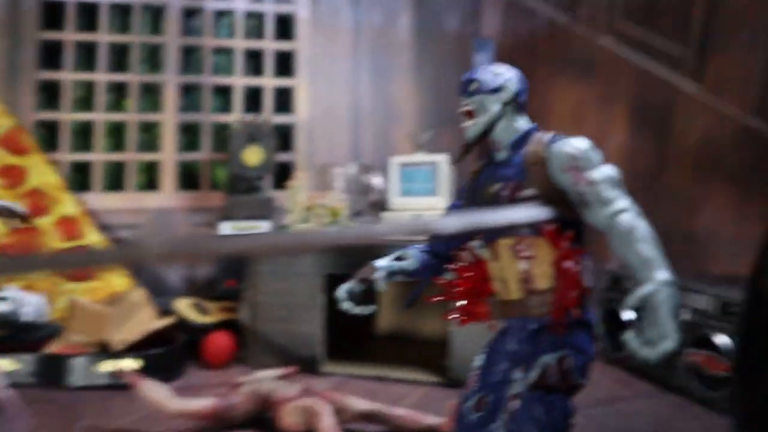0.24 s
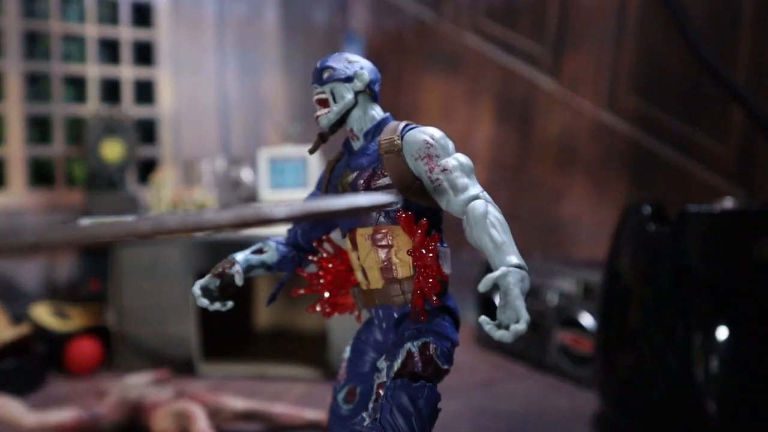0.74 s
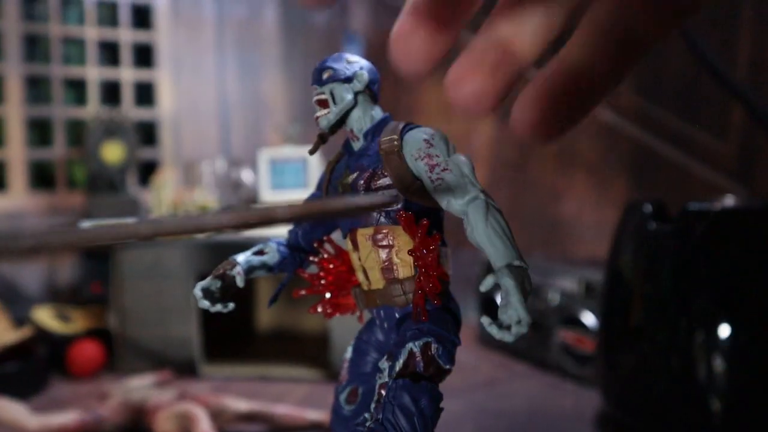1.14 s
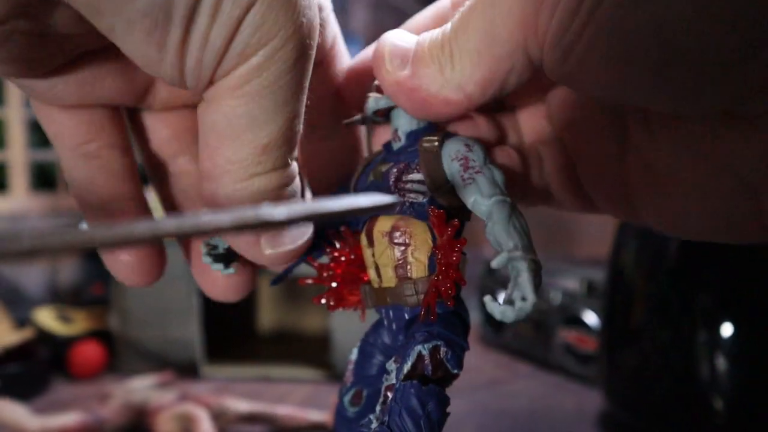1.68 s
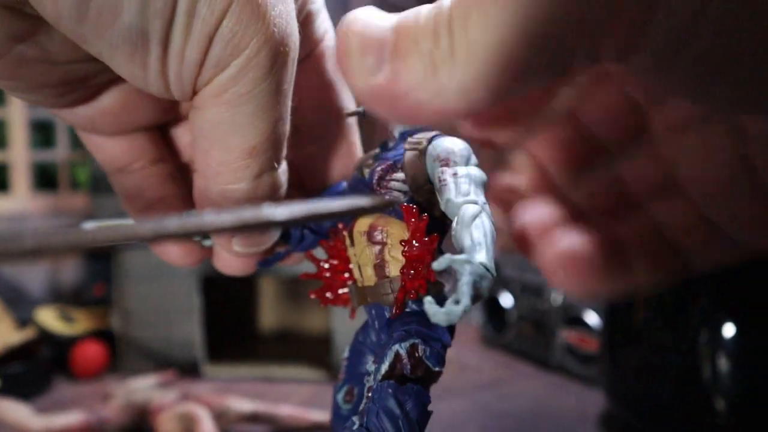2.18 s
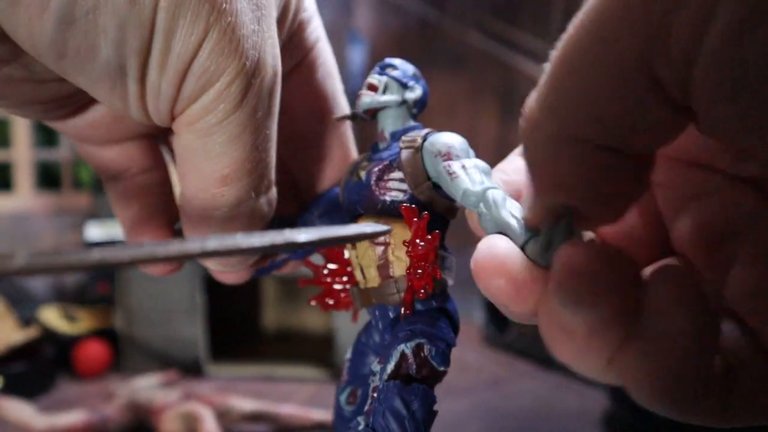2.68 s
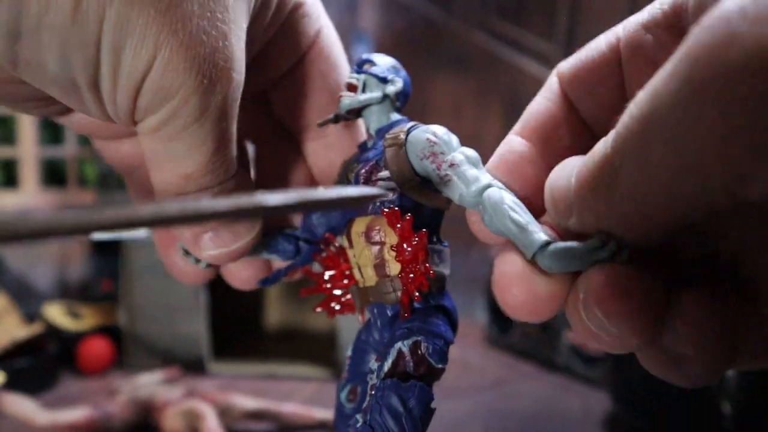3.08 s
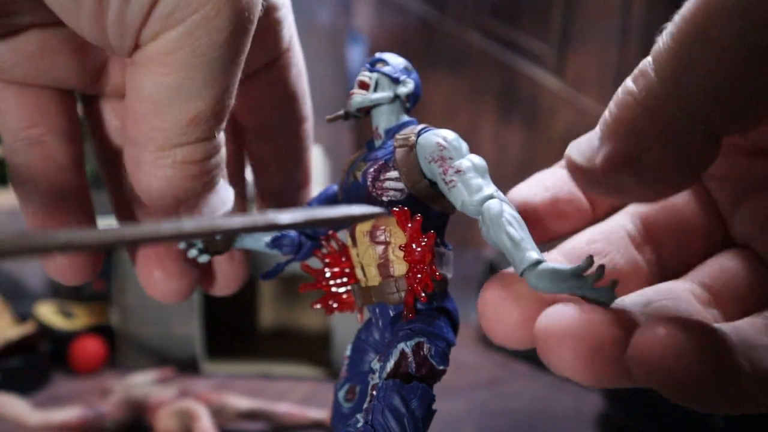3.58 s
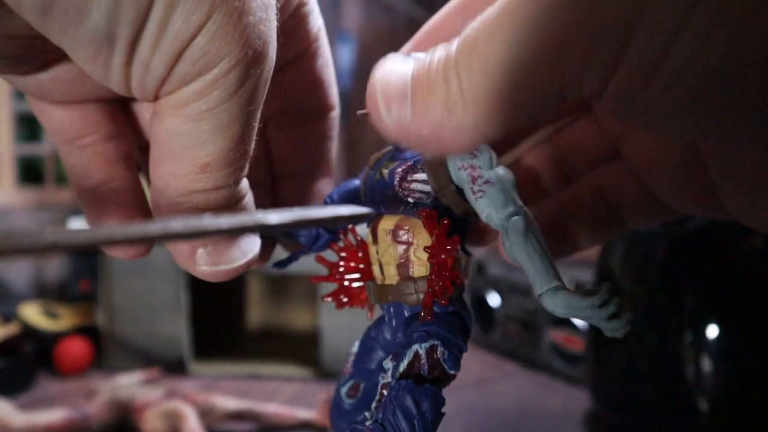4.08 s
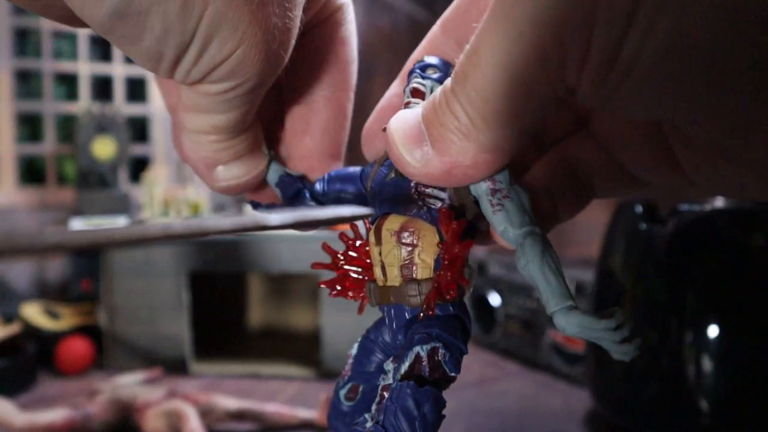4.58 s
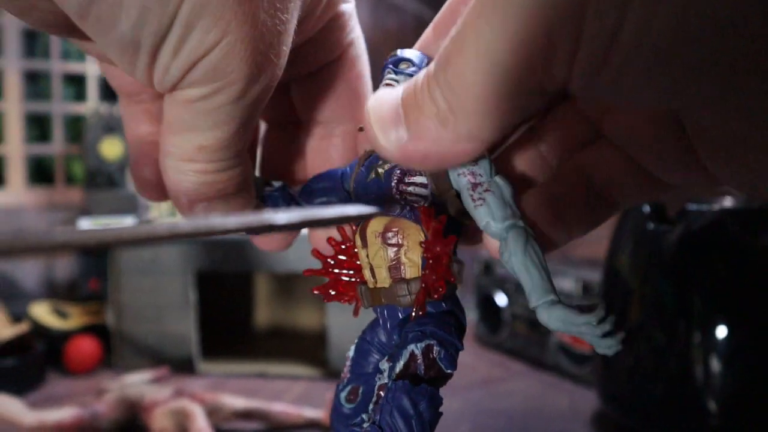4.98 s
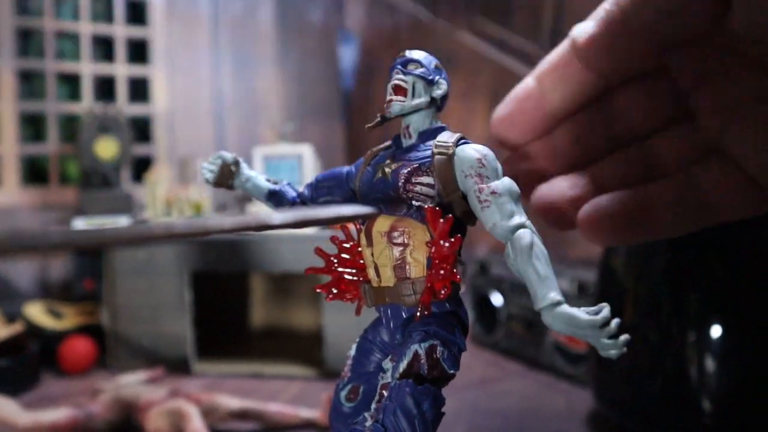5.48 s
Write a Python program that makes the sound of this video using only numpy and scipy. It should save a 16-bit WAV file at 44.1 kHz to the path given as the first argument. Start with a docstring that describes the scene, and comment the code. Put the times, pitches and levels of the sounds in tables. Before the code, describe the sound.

Close stereo in a small room: right away a stand swings and judders with deep thuds, dull clacks and fine crackle, dying out after half a second. Over faint air and a throbbing motor hum, hands then pose a plastic figure with crisp clicks, hollow limb knocks, light scrapes and one short squeak near two and a half seconds.

```python
"""A small room with a humming motor, where hands pose a plastic action figure on a table close to a stereo microphone.
The air is coloured noise; the motor is a set of loosely locked overtones, throbbing about thirty times a second.
The microphone's stand is swung round and judders to rest: impulses ring its modes and set off noise bursts.
Then joints and small parts click, knock, scrape and squeak: noise bursts, short tones and a ringing body."""
import sys
import numpy as np
from scipy import signal
from scipy.fft import rfft, irfft, next_fast_len
from scipy.io import wavfile

SR = 44100
rng = np.random.default_rng(int(sys.argv[2]) if len(sys.argv) > 2 else 0)


def unload_wav(signal):
    """Save mono or channel-first audio to the path in sys.argv[1] as 16-bit WAV at rate SR, clipped to [-1, 1]."""
    wavfile.write(
        sys.argv[1],
        SR,
        np.round(np.clip(np.atleast_2d(signal).T, -1, 1) * 32767).astype(np.int16),
    )


N = 253073
TIME = np.arange(N) / SR

# Levels in tables are source settings, ahead of offsets, filters and panning; noise colours are relative shapes.
# room rumble colour: pitch_hz, density_db_per_hz
RUMBLE_COLOUR = [(15, -43), (28, -2.5), (45, -0.5), (75, 4.5), (120, 4), (180, 10.5), (260, -2.5),
                 (400, -36.5)]
# murky middle colour: pitch_hz, density_db_per_hz
MIDDLE_COLOUR = [(130, -0.5), (250, 4.5), (550, 1.5), (900, -2.5), (1400, -5.5), (2800, -11.5),
                 (5000, -17.5), (9000, -36)]
# hiss colour: pitch_hz, density_db_per_hz
HISS_COLOUR = [(1200, 9), (3000, 5), (5000, 2), (8000, -3), (11000, 0), (12500, -16), (16000, -55)]
# stereo width of the room: pitch_hz, side_minus_mid_db
ROOM_WIDTH = [(60, -14), (110, -18.5), (200, -7.5), (380, 1), (700, -0.5), (1290, 5.5), (2380, 4.5),
              (4400, 6.5), (8120, 5), (15000, 14.5)]
# stereo width right at the microphone: pitch_hz, side_minus_mid_db
NEAR_WIDTH = [(120, -24), (250, -25), (500, -0.5), (1000, -5), (2000, 1), (4000, 4.5), (10000, 7.5),
              (15000, 0.5)]
# motor running speed, sag excluded: time_s, turns_per_s
MOTOR_SPEED = [(1.8, 31), (2.4, 30.8), (3.0, 29.5), (4.0, 30.3), (5.0, 30.15), (5.74, 30.1)]
# overtones of the deep drone: multiple_of_turning_rate, level_db
DEEP_OVERTONES = [(4, -13.5), (5, -5), (6, -6.5), (7, 1), (8, -19), (9, -9.5), (10, -24), (16, -24),
                  (20, -19.5)]
# overtones of the upper drone: multiple_of_turning_rate, level_db
UPPER_OVERTONES = [(11, -8), (12, 1.5), (13, -7)]
# deep drone level: time_s, level_db
DEEP_LEVEL = [(0, -49), (1.1, -50.5), (2.4, -48.5), (3.0, -42), (3.7, -44), (4.549, -39), (5.0, -42),
              (5.74, -45.5)]
# upper drone level: time_s, level_db
UPPER_LEVEL = [(0.7, -51.5), (0.95, -57), (1.75, -49), (2.05, -62.5), (2.8, -54.5), (3.8, -55),
               (4.46, -44.5), (5.23, -47), (5.74, -42)]
# jolts of the stand: start_s, thud_db, clack_db, clack_pitch_hz, rattle_db
STAND_JOLTS = [(0.166, -8.5, -18.5, 310, -30), (0.1728, -21, -13.5, 984, -19.5), (0.18, -14, -20, 500, -38),
               (0.1866, -13, -17.5, 760, -34), (0.192, -23, -25.5, 330, -33),
               (0.205, -35, -21.5, 1100, -32.5), (0.2135, -20, -19, 470, -33), (0.227, -27, -25, 400, -39),
               (0.252, -25, -33, 400, -51), (0.3265, -28, -23, 875, -31), (0.331, -13.5, -30, 240, -45),
               (0.344, -18, -23.5, 800, -33), (0.3768, -17, -22.5, 800, -41), (0.3923, -17, -26, 716, -43),
               (0.4013, -31, -24.5, 1155, -47), (0.413, -22, -28.5, 380, -50), (0.44, -29, -35, 450, -32),
               (0.495, -19, -31, 400, -45.5), (0.511, -16, -33, 905, -53), (0.544, -17, -37, 300, -51),
               (0.572, -28.5, -32.5, 1260, -56), (0.586, -44, -48, 750, -60), (4.7, -29, -44, 860, -46)]
# modes of the stand: pitch_hz, level_db, t60_s
STAND_MODES = [(46.4, -20, 0.096), (78.4, -6, 0.097), (105.6, -7.5, 0.24), (148, -4, 0.083),
               (182.9, -8, 0.058), (274, -19, 0.053)]
# colour of the stand's clack: pitch_hz, density_db_per_hz
CLACK_COLOUR = [(25, -1), (90, -4), (250, 9.5), (450, 6.5), (700, 1), (1050, -1), (1500, -12), (3000, -23),
                (8000, -45)]
# colour of its loose parts: pitch_hz, density_db_per_hz
RATTLE_COLOUR = [(300, -53), (1500, 5.5), (3000, -2.5), (4600, 7), (6000, 5.5), (8500, 11), (11000, 9),
                 (12500, -6), (16000, -27)]
# colour of its crackle: pitch_hz, density_db_per_hz
CRACKLE_COLOUR = [(200, 6), (1000, -1), (2200, -1), (4000, -2.5), (7000, -0.5), (14000, -45)]
# modes of the figure's body: pitch_hz, level_db, t60_s
BODY_MODES = [(127, -3.5, 0.053), (283, 0, 0.027), (452, -1, 0.038), (658, 2, 0.025), (771, 2, 0.027),
              (1013, -5.5, 0.055), (1200, -2, 0.015), (1510, 2.5, 0.0058), (1894, -4, 0.021),
              (2850, -4.5, 0.022)]
# colour of a plastic snap: pitch_hz, density_db_per_hz
SNAP_COLOUR = [(400, -13), (1500, -7), (2300, 2), (3100, 4), (4200, 2.5), (5800, 1.5), (7500, 0.5),
               (10500, 2), (12500, -7.5), (16000, -31)]
# soft band-noise swells: the stand's scuff and falling chirp, rubs on the toy, low body of the joint's squeak:
# start_s, length_s, start_pitch_hz, end_pitch_hz, width_hz, level_db
NOISE_SWELLS = [(0.027, 0.057, 1890, 2300, 1000, -38), (0.207, 0.012, 4900, 2200, 300, -36),
                (0.443, 0.031, 2000, 3400, 1500, -42.5), (1.1, 0.091, 9400, 9800, 3992, -51.5),
                (1.109, 0.28, 2210, 2000, 600, -54.5), (2.185, 0.038, 10100, 10100, 4000, -55),
                (2.437, 0.058, 216, 203, 90, -38.5), (3.071, 0.075, 1053, 2900, 900, -51),
                (4.396, 0.044, 1303, 800, 600, -53), (4.84, 0.045, 9020, 8700, 3020, -56)]
# finger grips: start_s, length_until_release_s, effort_0_to_1
GRIPS = [(1.387, 0.59, 0.44), (1.963, 1.34, 0.28), (3.746, 0.28, 0.15), (4.164, 0.39, 0.6),
         (4.69, 0.37, 0.52)]
# sliding parts and fingertips: start_s, length_s, grit_db, body_db
SCRAPES = [(0.039, 0.022, -52, -41), (1.273, 0.014, -44, -54), (1.283, 0.025, -51.5, -43),
           (1.439, 0.02, -46, -45.5), (2.644, 0.025, -45.5, -53), (2.778, 0.036, -43.5, -48.5),
           (3.082, 0.053, -48, -57.5), (4.25, 0.052, -62, -51.5), (4.458, 0.053, -53, -57),
           (4.6964, 0.0096, -25, -31), (4.702, 0.048, -51, -48), (4.773, 0.029, -48.5, -57)]
# limbs against the torso: start_s, level_db, pitch_hz
LIMB_KNOCKS = [(1.6025, -30.5, 1180), (1.6315, -23.5, 762), (1.927, -33, 1010), (2.802, -29, 670),
               (4.702, -35, 936)]
# slips of a tight joint: start_s, level_db
SQUEAK_SLIPS = [(2.4596, -23.5), (2.48, -41)]
# sharp plastic clicks: start_s, level_db, pitch_hz, body_db_relative_to_level
CLICKS = [(0.325, -18.5, 10200, -17), (0.573, -32, 4500, -11), (1.4422, -29.5, 4640, -23),
          (1.458, -32, 9000, -25), (1.5146, -35, 4800, -14), (1.522, -32, 4700, -20),
          (1.531, -15.5, 8000, -26), (1.5345, -28.5, 3120, -14), (1.6015, -20, 4220, -11),
          (1.6303, -23, 9800, -10), (1.6874, -37, 2920, -16), (1.7046, -32.5, 2510, -16),
          (1.8083, -29.5, 5470, -21), (1.8394, -38, 8900, -18), (1.861, -33.5, 2840, -25),
          (1.926, -21.5, 7200, -14), (2.0509, -38, 8300, -7.5), (2.1882, -25, 10500, -11.5),
          (2.4332, -27.5, 2850, -15), (2.4978, -34, 2900, -12), (2.5285, -31.5, 8000, -18),
          (2.645, -21.5, 9300, -31), (2.667, -35, 10100, -21), (2.691, -24, 9800, -35),
          (2.803, -38, 3100, -7), (2.8734, -34, 9200, -14), (2.9037, -25.5, 6760, -13.5),
          (3.011, -35.5, 3870, -24), (3.057, -44.5, 2880, -15), (3.13, -36, 3200, -12),
          (3.249, -33.5, 9600, -20), (3.7874, -37.5, 9750, -14), (3.8114, -45, 3110, -24),
          (3.9572, -39, 8960, -5), (4.056, -37.5, 2802, -20), (4.201, -32, 10620, -10.5),
          (4.2561, -33, 9800, -10), (4.2664, -37, 7000, -6), (4.2804, -26, 2620, -13.5),
          (4.323, -20, 10700, -21), (4.3419, -37, 2770, -12), (4.3862, -32.5, 7330, -14),
          (4.4092, -32, 10580, -23), (4.4803, -34.5, 2350, -12), (4.4904, -36.5, 5710, -21),
          (4.5034, -39, 6480, -9), (4.56, -41, 6600, 0.5), (4.6767, -33, 10600, -23),
          (4.6978, -16, 9600, -13), (4.7006, -19, 4200, -18.5), (4.7027, -19, 10000, -15),
          (4.776, -28, 8800, -8.5), (4.7795, -37, 8900, -20), (4.845, -39, 4460, -1),
          (4.9008, -38, 8500, -12), (4.9142, -33, 3100, -13), (4.9731, -42.5, 2430, -12),
          (5.0072, -33.5, 3050, -11), (5.012, -35, 4260, -12), (5.02, -34.5, 4840, -11)]

RUMBLE_DB, MIDDLE_DB, HISS_DB = -48.5, -47.5, -58
SWING_START_S, SWING_RISE_S, SWING_END_S = 0.013, 0.023, 0.54
SWING_RUMBLE_DB, SWING_RUMBLE_T60_S = -37.5, 0.63
SWING_HISS_DB, SWING_HISS_FADE_DB_PER_S = -43, 10
# one motor sag under load; its overtones tilt about the fifth
SAG_START_S, SAG_LENGTH_S, SAG_TURNS_PER_S = 1.84, 0.6, 8.8
SAG_FIFTH_GAIN_DB, SAG_TILT_DB_PER_OCTAVE = 0.5, 4.5
SHUDDER_DB, SHUDDER_HZ = -47.5, 88
DRAG_START_S, DRAG_LENGTH_S, DRAG_DB = 0.33, 0.1, -33
# crackle fades slowly, then by its t60 as well once the stand rests
CRACKLE_DB, CRACKLE_FADE_DB_PER_S = -38, 19
CRACKLE_REST_S, CRACKLE_T60_S = 0.573, 0.13
GRIP_RAMP_S = 0.12
# at full effort
TICKS_PER_S, RUSTLE_DB = 140, -55
SQUEAK_START_HZ, SQUEAK_RISE_HZ_PER_S = 1063, 1400
SQUEAK_ATTACK_S, SQUEAK_HOLD_S, SQUEAK_T60_S = 0.002, 0.0063, 0.031
CUTOFF_HZ = 16300


def from_db(db):
    """Decibels to gain."""
    return 10 ** (np.asarray(db) / 20)


def rms_one(x):
    """Scale to unit rms."""
    return x / np.sqrt(np.mean(x ** 2) + 1e-20)


def since(start_s):
    """Seconds passed since a moment; zero before it."""
    return np.maximum(TIME - start_s, 0)


def in_time(points):
    """Interpolate (s, value) points at every sample."""
    s, value = np.transpose(points)
    return np.interp(TIME, s, value)


def add(out, start_s, sound):
    """Mix a short sound in at its moment."""
    i = round(start_s * SR)
    out[..., i:i + sound.shape[-1]] += sound


def noise():
    """Two unrelated white noises."""
    return rng.standard_normal((2, N))


def grit(spread_db):
    """Noise made of tiny slips, 32 samples each, of uneven size."""
    sizes = from_db(spread_db * rng.standard_normal(N // 32 + 1))
    return rms_one(noise() * np.repeat(sizes, 32)[:N])


def drift(points_per_s):
    """Slow random curve about zero; its points have unit spread."""
    points = rng.standard_normal(1024)
    return np.interp(TIME * points_per_s, np.arange(len(points)), points)


def blows(times_s, level_db):
    """One impulse for each event."""
    out = np.zeros(N)
    np.add.at(out, np.round(np.asarray(times_s) * SR).astype(int), from_db(level_db))
    return out


def fade(impulses, t60_s):
    """Envelope of energy put in by impulses and dying away."""
    energy_decay = from_db(-120 / (t60_s * SR))
    energy = signal.lfilter([1], [1, -energy_decay], impulses ** 2 + 1e-18)
    return np.sqrt(energy)


def colour(x, spectrum, keep_power=True):
    """Causal (minimum-phase) filter that follows (Hz, dB) points."""
    size = 2 * next_fast_len(N // 2 + 4096)
    point_hz, point_db = np.transpose(spectrum)
    bin_hz = np.arange(size // 2 + 1) * SR / size
    gain = from_db(np.interp(np.log(bin_hz + 1), np.log(point_hz), point_db))
    if keep_power:
        gain = rms_one(gain)
    # folding the cepstrum makes the phase minimal
    cepstrum = irfft(np.log(gain))
    cepstrum[1:size // 2] *= 2
    cepstrum[size // 2 + 1:] = 0
    response = np.exp(rfft(cepstrum))
    return irfft(rfft(x, size) * response)[..., :N]


def stereo(pair, width):
    """Filter mid and side to the given width, then form left and right."""
    mid_gain = [(hz, -10 * np.log10(1 + from_db(db) ** 2)) for hz, db in width]
    side_gain = [(hz, -10 * np.log10(1 + from_db(-db) ** 2)) for hz, db in width]
    mid = colour(pair[0], mid_gain, keep_power=False)
    side = colour(pair[1], side_gain, keep_power=False)
    return np.array([mid + side, mid - side])


def ring(x, modes):
    """Resonators in parallel, alternating in sign; a unit impulse rings each at its own level."""
    out = 0
    for k, (hz, db, t60_s) in enumerate(modes):
        radius = from_db(-60 / (t60_s * SR))
        w = 2 * np.pi * hz / SR
        feedback = [1, -2 * radius * np.cos(w), radius * radius]
        mode = signal.lfilter([0, from_db(db) * np.sin(w)], feedback, x + 1e-18)
        out = out + (-1) ** k * mode
    return out


def knocks(rows, t60_s, rise_s):
    """Blunt contacts: each a decaying sine at the pitch of the spot that is hit."""
    age, out = TIME[:4096], np.zeros(N)
    for s, db, hz in rows:
        envelope = from_db(db - 60 * age / t60_s) * (1 - np.exp(-age / rise_s))
        add(out, s, envelope * np.sin(2 * np.pi * hz * age))
    return out


def effort():
    """How hard the fingers work: each grip tightens, holds and lets go."""
    total = np.zeros(N)
    for s, length_s, hard in GRIPS:
        tighten = np.minimum(since(s) / GRIP_RAMP_S, 1)
        release = np.minimum(since(s + length_s) / GRIP_RAMP_S, 1)
        total += hard * (tighten - release)
    return total


def air():
    """Steady noise rush of rumble, middle and hiss; swinging stand and rustling fingers add to it."""
    after_swing = since(SWING_END_S)
    swing_rumble = from_db(SWING_RUMBLE_DB - 60 * after_swing / SWING_RUMBLE_T60_S)
    rumble_gain = np.hypot(from_db(RUMBLE_DB), swing_rumble)
    swing_hiss = from_db(SWING_HISS_DB - SWING_HISS_FADE_DB_PER_S * after_swing)
    swing_hiss = swing_hiss * np.minimum(since(SWING_START_S) / SWING_RISE_S, 1)
    rustle_power = from_db(RUSTLE_DB) ** 2 * effort()
    hiss_gain = np.sqrt(from_db(HISS_DB) ** 2 + swing_hiss ** 2 + rustle_power)
    rumble = colour(noise() * rumble_gain, RUMBLE_COLOUR)
    middle = colour(noise() * from_db(MIDDLE_DB), MIDDLE_COLOUR)
    hiss = colour(noise() * hiss_gain, HISS_COLOUR)
    return stereo(rumble + middle + hiss, ROOM_WIDTH)


def motor(scatter_rad=0.91, flutter_db=2.0, deep_waver_rad=0.34, upper_waver_rad=0.9, shudder_q=2.6):
    """Overtones of the turning rate, loosely in step, throb; under load it slows, dulls and shudders."""
    load = np.sin(np.pi * np.minimum(since(SAG_START_S) / SAG_LENGTH_S, 1))
    turns = np.cumsum(in_time(MOTOR_SPEED) - SAG_TURNS_PER_S * load) / SR
    peak = signal.iirpeak(SHUDDER_HZ, shudder_q, fs=SR)
    shudder = signal.lfilter(*peak, signal.lfilter(*peak, noise()[0]))
    out = from_db(SHUDDER_DB) * load * rms_one(shudder)
    deep = (DEEP_OVERTONES, DEEP_LEVEL, deep_waver_rad)
    upper = (UPPER_OVERTONES, UPPER_LEVEL, upper_waver_rad)
    for overtones, level, waver_rad in (deep, upper):
        drone_db = in_time(level)
        for multiple, db in overtones:
            phase = scatter_rad * rng.standard_normal() + waver_rad * drift(14.0)
            angle = 2 * np.pi * multiple * turns + phase
            sag_db = load * (SAG_FIFTH_GAIN_DB - SAG_TILT_DB_PER_OCTAVE * np.log2(multiple / 5))
            gain = from_db(drone_db + db + sag_db + flutter_db * drift(9.8))
            out = out + np.sqrt(2) * gain * np.sin(angle)
    return out * from_db([[-.2], [-.8]])


def stand(clack_t60_s=0.064, rattle_t60_s=0.22, left_db=1.5, ring_db=0.5, clack_noise_db=-2.0):
    """Jolts thud in the modes, clack in the head and leave loose parts sizzling; the head also drags."""
    s, thud_db, clack_db, clack_hz, rattle_db = np.transpose(STAND_JOLTS)
    thud = ring(blows(s, thud_db), STAND_MODES)
    rung = knocks(zip(s, clack_db + ring_db, clack_hz), t60_s=0.021, rise_s=0.0012)
    drag = from_db(DRAG_DB) * np.sin(np.pi * np.minimum(since(DRAG_START_S) / DRAG_LENGTH_S, 1))
    clack_gain = fade(blows(s, clack_db + clack_noise_db), clack_t60_s)
    clack = colour(grit(2.4) * np.hypot(clack_gain, drag), CLACK_COLOUR)
    rattle_gain = fade(blows(s, rattle_db), rattle_t60_s)
    rattle = colour(grit(2.3) * rattle_gain, RATTLE_COLOUR)
    head = (rung + stereo(clack, NEAR_WIDTH)) * from_db([[left_db], [-left_db]])
    return thud + head + stereo(rattle, NEAR_WIDTH)


def crackle(grain_db=3.5, judder_db=-22.0):
    """The stand's head catches in fine, uneven slips that shake the stand and fade as it rests."""
    slowing = from_db(CRACKLE_DB - CRACKLE_FADE_DB_PER_S * since(DRAG_START_S))
    slowing = slowing * from_db(-60 * since(CRACKLE_REST_S) / CRACKLE_T60_S) * (TIME > DRAG_START_S)
    judder = from_db(judder_db) * ring(rng.standard_normal(N) * slowing, STAND_MODES)
    slips = colour(grit(grain_db) * slowing, CRACKLE_COLOUR)
    return stereo(slips, NEAR_WIDTH) + judder


def noise_swells():
    """Soft swells, each of noise in one band whose centre slides in pitch."""
    out = np.zeros((2, N))
    for s, length_s, start_hz, end_hz, width_hz, db in NOISE_SWELLS:
        along = np.linspace(0, 1, int(length_s * SR))
        lowpass = signal.butter(2, width_hz / 2, fs=SR, output="sos")
        real, imaginary = signal.sosfilt(lowpass, rng.standard_normal((2, 2, len(along))))
        # shift the low band up to the sliding centre
        angle = 2 * np.pi * np.cumsum(start_hz * (end_hz / start_hz) ** along) / SR
        band = rms_one(real * np.cos(angle) + imaginary * np.sin(angle))
        add(out, s, from_db(db) * np.sin(np.pi * along) * band)
    return out


def fidget(tick_db=-49.0, spread_db=5.5, chafe_db=-53.0):
    """Straining fingers set off tiny ticks at random and chafe softly on the ringing body."""
    strain = effort()
    born = rng.random(N) < TICKS_PER_S * strain / SR
    sizes = from_db(tick_db + spread_db * np.clip(rng.standard_normal(N), -2, 2))
    ticks = noise() * fade(born * sizes, 0.0071)
    chafe_gain = strain * from_db(chafe_db + 2.5 * drift(28.0))
    chafe = rms_one(ring(grit(4.0), BODY_MODES)) * chafe_gain
    return colour(ticks, SNAP_COLOUR) + 0.088 * ring(ticks, BODY_MODES) + chafe


def scrapes(grain_db=5.0, shake_db=-18.5):
    """Sliding plastic catches and slips many times, shaking the body."""
    edge, push = np.zeros(N), np.zeros(N)
    for s, length_s, grit_db, body_db in SCRAPES:
        stroke = np.sqrt(np.abs(np.sin(np.pi * np.clip((TIME - s) / length_s, 0, 1))))
        edge += from_db(grit_db) * stroke
        push += from_db(body_db) * stroke
    scratch = colour(grit(grain_db) * edge, SNAP_COLOUR)
    return scratch + from_db(shake_db) * ring(grit(grain_db) * push, BODY_MODES)


def limb_knocks():
    """Limbs knock hollowly against the torso: short decaying tones."""
    return knocks(LIMB_KNOCKS, t60_s=0.025, rise_s=0.00045) * from_db([[1.0], [-1.0]])


def squeak(rough=0.3, left_db=1.5, right_db=-6.0, slip_db=-24):
    """A tight joint's slips catch, hold and die as the pitch creeps up; uneven slips shake the body."""
    hz = SQUEAK_START_HZ + SQUEAK_RISE_HZ_PER_S * since(SQUEAK_SLIPS[0][0])
    strength = np.zeros(N)
    for s, db in SQUEAK_SLIPS:
        attack = np.minimum(since(s) / SQUEAK_ATTACK_S, 1)
        strength += attack * from_db(db - 60 * since(s + SQUEAK_HOLD_S) / SQUEAK_T60_S)
    tone = np.sin(2 * np.pi * np.cumsum(hz) / SR) * strength * (1 + rough * drift(170))
    shake = 0.12 * ring(grit(1.8)[0] * strength * from_db(slip_db), BODY_MODES)
    return (tone + shake) * from_db([[left_db], [right_db]])


def clicks(crack_t60_s=0.0031, rise_s=0.00037, ring_share=0.56, ring_q=6.0, snap_db=4.5,
           knock_db=-10.5, knock_t60_s=0.0049, grip_detune=0.081, delay_s=0.00064):
    """A part snaps: a crack rings at its own pitch and knocks the body, whose pitch shifts with the grip."""
    age = TIME[:3072]
    crack_shape = from_db(-60 * age / crack_t60_s) * (1 - np.exp(-age / rise_s))
    push_shape = from_db(-60 * age / knock_t60_s)
    cracks, body = np.zeros((2, 2, N))
    for s, db, hz, body_db in CLICKS:
        burst = rng.standard_normal((2, len(age))) * crack_shape
        rung = signal.lfilter(*signal.iirpeak(hz, ring_q, fs=SR), burst)
        crack = rms_one(0.66 * burst + 2 * ring_share * rung)
        add(cracks, s + delay_s, from_db(db + snap_db) * 0.05 * crack)
        push = rng.choice([-1, 1], (2, len(age))) * push_shape
        gripped = np.array(BODY_MODES) * [np.exp(grip_detune * rng.standard_normal()), 1, 1]
        add(body, s + delay_s, from_db(db + body_db + knock_db) * rms_one(ring(push, gripped)))
    return colour(cracks, SNAP_COLOUR) + body


def room(x, near_db=-10.0, near_t60_s=0.012, far_db=-19.5, far_t60_s=0.19):
    """Decaying noise echoes: quick reflections off table and props, then the room's faint tail."""
    age = TIME[:SR // 2]
    out = x
    for db, t60_s in ((near_db, near_t60_s), (far_db, far_t60_s)):
        echoes = rng.standard_normal((2, len(age))) * from_db(-60 * age / t60_s) * (age > .001)
        echoes = rms_one(echoes) / np.sqrt(len(age))  # unit energy
        out = out + from_db(db) * signal.fftconvolve(x, echoes, axes=1)[:, :N]
    return out


def scene():
    """Air, motor and stand, then the noise swells and the toy with their reflections."""
    background = air() + motor() + stand() + crackle()
    near = stereo(noise_swells() + fidget() + scrapes() + clicks(), NEAR_WIDTH)
    foreground = room(near + limb_knocks() + squeak())
    return background + foreground


def record(dry):
    """Steep elliptic low-pass cuts the top."""
    lowpass = signal.ellip(10, .1, 90, CUTOFF_HZ, fs=SR, output="sos")
    return signal.sosfilt(lowpass, dry)


dry = scene()
out = record(dry)
unload_wav(out)
```